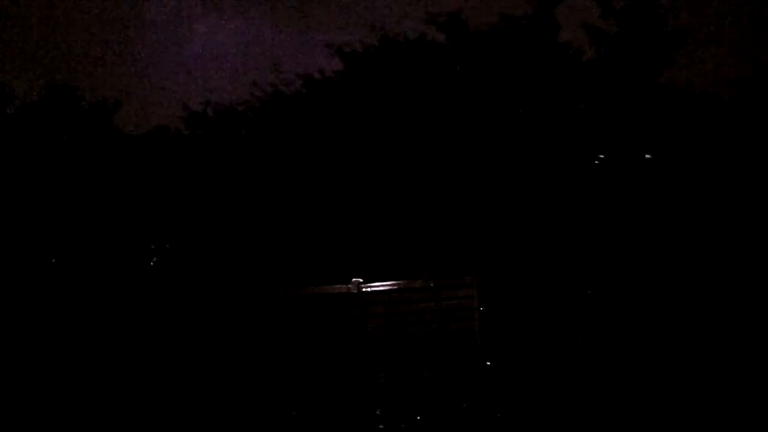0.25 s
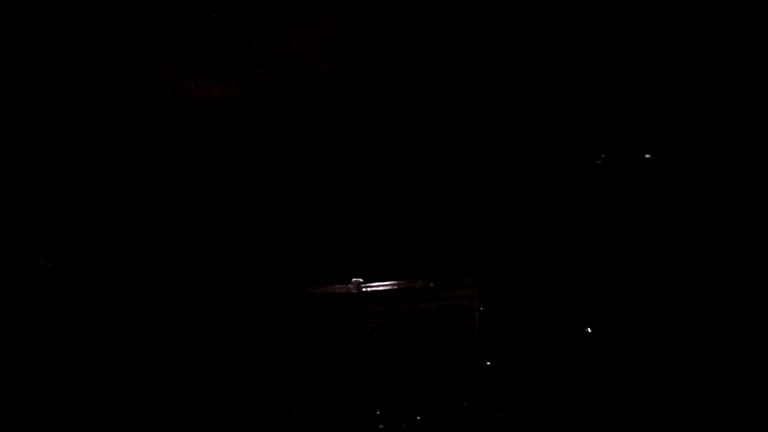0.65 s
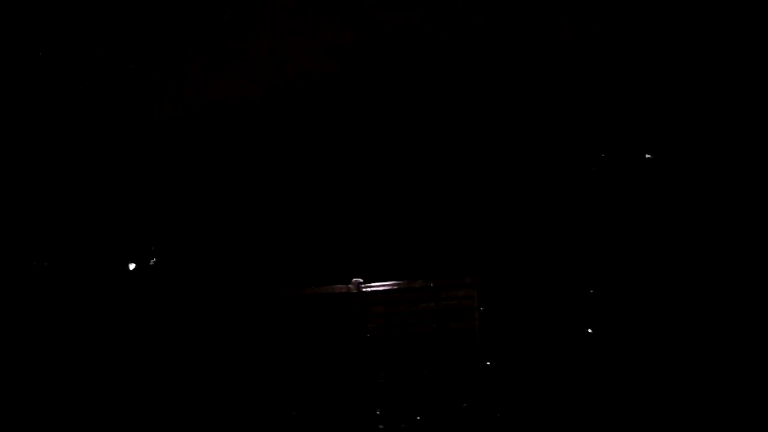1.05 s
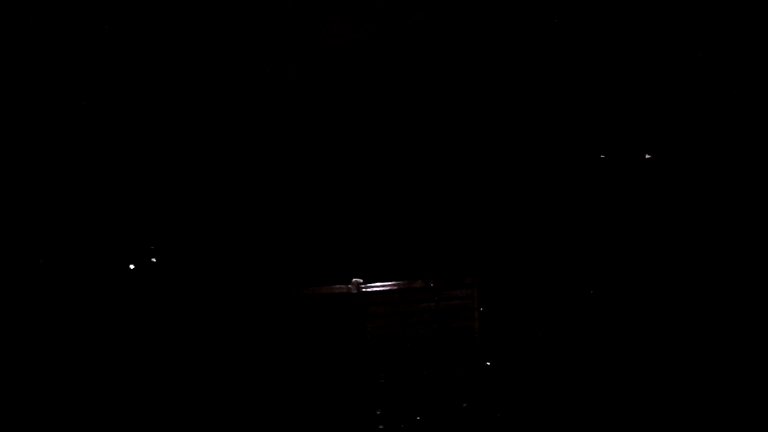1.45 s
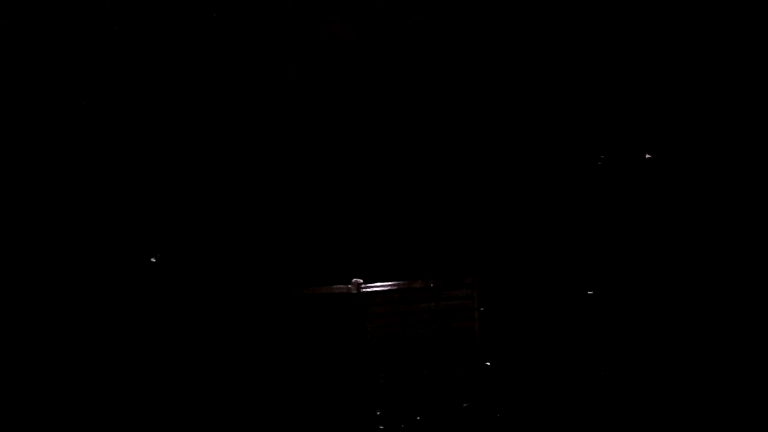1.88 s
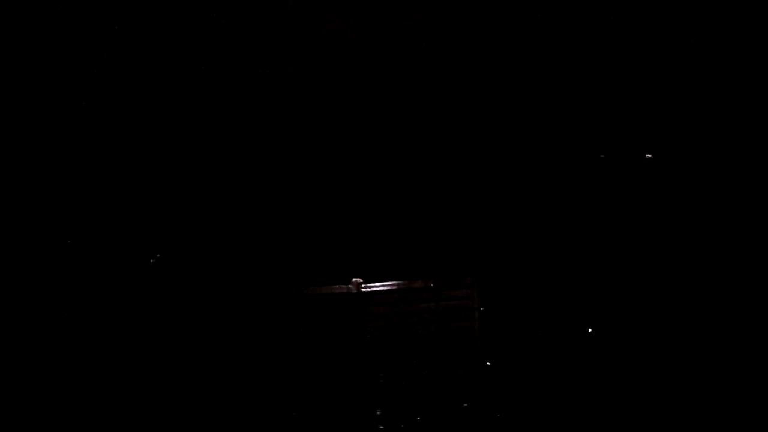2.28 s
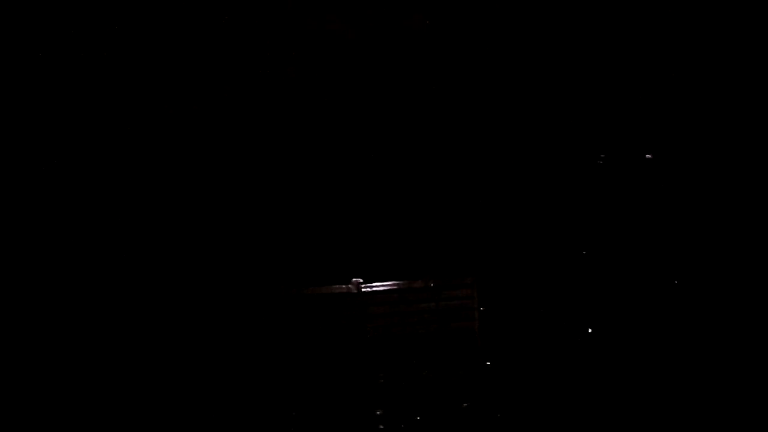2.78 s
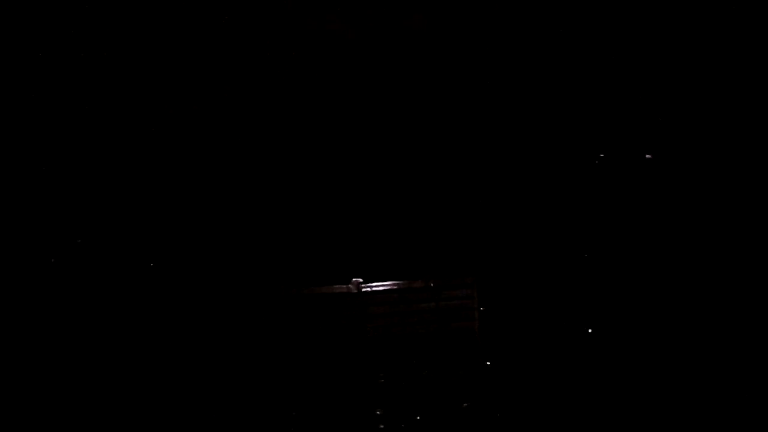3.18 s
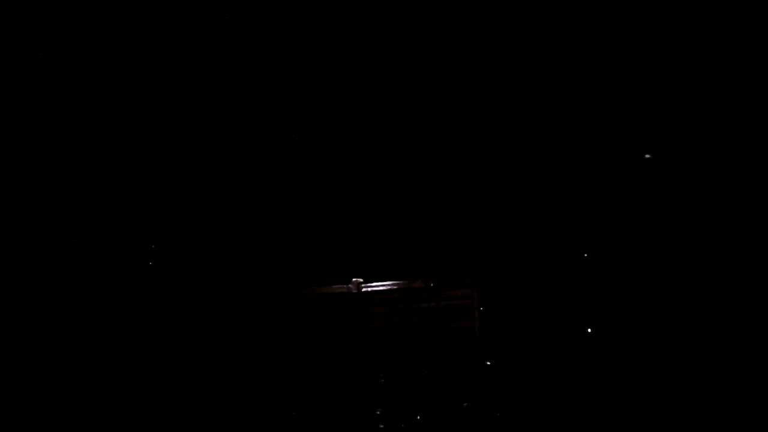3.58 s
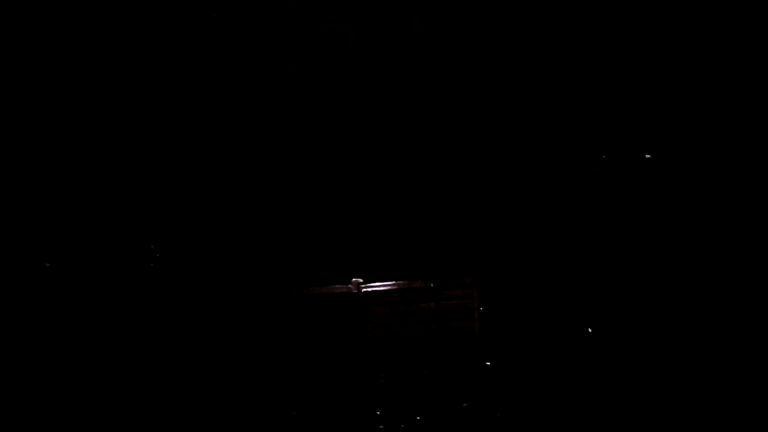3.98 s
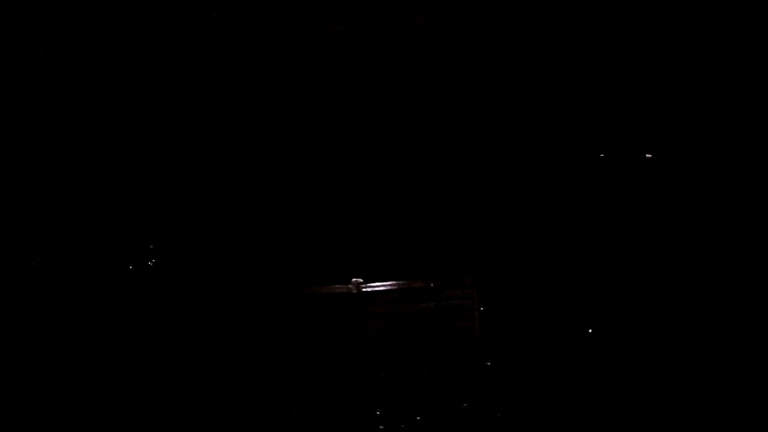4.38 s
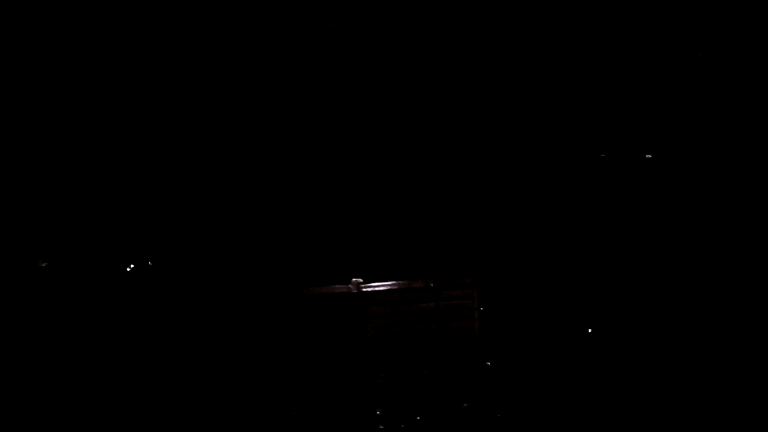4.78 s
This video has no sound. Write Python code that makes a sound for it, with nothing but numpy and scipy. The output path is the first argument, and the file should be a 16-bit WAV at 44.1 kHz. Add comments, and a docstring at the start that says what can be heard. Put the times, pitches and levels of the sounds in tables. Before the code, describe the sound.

Outdoors on a wet night, a small fixed camera's dull, narrow-band microphone hears steady rain. A bang is already fading at the start; two more follow within the first second, the second with a very sharp crack, their echoes crackling away. Wind then rumbles and thumps the microphone. Another hard crack comes near the middle, then a few close drips, and a last softer-edged bang near the end.

```python
"""Bangs over a wet night

Outdoors at night, one microphone in a small fixed camera: far rain is shaped noise, nearer drops are random clicks.
Wind at the port is swelling noise with single low thumps; close drips are gliding bubble notes with a splatter.
Five sharp bangs in the sky, most likely fireworks, scatter off ground, trees and houses into fading tails of clicks;
the first is already fading at the start. Two bangs also send a direct shock, and the housing rings slightly."""
import sys
import numpy as np
from scipy import signal
from scipy.fft import rfft, irfft, next_fast_len
from scipy.io import wavfile

SR = 44100
rng = np.random.default_rng(int(sys.argv[2]) if len(sys.argv) > 2 else 0)


def store_wav(level_fs):
    """Save 16-bit WAV to argv[1]."""
    pcm = np.round(np.clip(np.atleast_2d(level_fs), -1, 1) * 32767)
    wavfile.write(sys.argv[1], SR, pcm.T.astype(np.int16))


N = 222382
TIME = np.arange(N) / SR


def gain_of(db):
    """Decibels to amplitude."""
    return 10 ** (np.asarray(db) / 20)


def evened(x):
    """Scales to rms 1."""
    return x / np.sqrt(np.mean(x ** 2) + 1e-20)


def coloured(x, points, tilt_db=0):
    """Gives x a spectrum, tilted by some dB an octave, at rms 1."""
    size = next_fast_len(N)
    hz = np.fft.rfftfreq(size, 1 / SR) + 1  # the added 1 avoids log of zero
    f, db = np.transpose(points)
    spectrum_db = np.interp(np.log(hz), np.log(f), db) + tilt_db * np.log2(hz)
    return evened(irfft(rfft(x, size) * gain_of(spectrum_db), size)[:N])


def wander(rate_hz):
    """Slow random drift of rms 1, mostly below the given rate."""
    size = next_fast_len(N)
    hz = np.fft.rfftfreq(size, 1 / SR)
    slow = (hz > 0) / (1 + (hz / rate_hz) ** 4)
    return evened(irfft(rfft(rng.standard_normal(N), size) * slow, size)[:N])


def arrivals(per_s, spread_db):
    """Clicks at random moments, of either sign; a few are much larger than the rest."""
    size = gain_of(spread_db * np.minimum(rng.exponential(1, N), 4))
    sign = rng.choice([-1., 1.], N)
    return size * sign * (rng.random(N) < per_s / SR)


def packet(s, length, fade):
    """An envelope that opens within 0.36 ms, holds for a length, then dies away."""
    age = TIME - s
    return np.clip(age / 0.00036, 0, 1) * np.exp(-np.maximum(age - length, 0) / fade)


def low_pass(x, edge_hz):
    """A steep band limit."""
    return signal.oaconvolve(x, signal.firwin(255, edge_hz, window=("kaiser", 8), fs=SR), "same")


def strikes(rows):
    """One click for each row (t/s, level/dB)."""
    out = np.zeros(N)
    for s, db in rows:
        out[round(s * SR)] = gain_of(db)
    return out


def pressure_spike(t, width):
    """A sharp swing of pressure, down and straight back up, of peak 1."""
    u = t / width - 1
    return u * np.exp((1 - u ** 2) / 2)


# relative spectrum of the rain, far and near: f/Hz, level/dB per Hz
RAIN_SPECTRUM = [(15, -35), (25, 1.5), (51, -7), (87, -5), (157, -7.5), (185, -5), (213, -5), (510, -6.5),
                 (560, -7), (661, -6.5), (919, -6), (1620, -9.5), (2050, -16.5), (3600, -17), (6970, -34),
                 (9060, -58), (15300, -120)]
RAIN_DB, DROPS_DB, DROPS_PER_S = -35.5, -47, 700


def rain():
    """Countless far impacts merge into a smooth wash; nearer drops patter singly over it."""
    wash = coloured(rng.standard_normal(N), RAIN_SPECTRUM) * gain_of(0.41 * wander(rate_hz=5.3))
    drops = coloured(arrivals(DROPS_PER_S, spread_db=5.0), RAIN_SPECTRUM, tilt_db=-1.0)
    return gain_of(RAIN_DB) * wash + gain_of(DROPS_DB) * drops


# gusts at the microphone: peak t/s, rumble level/dB and flutter level/dB before trim and wander, rise/s, fall/s
GUSTS = [(1.235, -34, -29.5, 0.084, 0.04), (1.325, -38, -31, 0.076, 0.048), (1.47, -27, -25, 0.14, 0.06),
         (1.55, -25.5, -24, 0.046, 0.08), (1.67, -26.5, -24, 0.052, 0.095),
         (1.815, -30, -25.5, 0.06, 0.048), (1.885, -27, -29, 0.045, .07), (1.98, -30.5, -33, 0.048, 0.27),
         (2.762, -32, -27, 0.048, 0.027), (2.82, -38, -40, 0.038, 0.045), (3.195, -26, -36.5, 0.092, 0.052),
         (3.491, -35.5, -45, 0.077, 0.12), (4.14, -40, -40.5, 0.057, 0.14), (4.945, -40, -41, 0.041, 0.043)]
# relative spectra of the deep rumble, the lumpy flutter and the rasp of hard gusts: f/Hz, level/dB per Hz
RUMBLE_SPECTRUM = [(12, -21), (28, 5.5), (65, -3.5), (105, -6.5), (180, -13.5), (400, -60)]
FLUTTER_SPECTRUM = [(50, -44), (110, -0.5), (190, -0.5), (300, -2.5), (430, -12.5), (800, -14),
                    (2000, -51.5)]
RASP_SPECTRUM = [(170, -22), (300, 9), (560, 1), (800, -9), (1500, -27)]
GUST_DROP_DB, GUST_SHAPE = 9.5, 1.9  # a gust is this much weaker one rise before and one fall after its rounded peak
RASP_DB, RASP_GROWTH = -42.5, 2.6  # level at the strongest flutter; the power of flutter strength that it follows


def wind():
    """Eddies at the microphone port: rumble and flutter swell with each gust; the hardest gusts rasp."""
    rumble = coloured(rng.standard_normal(N), RUMBLE_SPECTRUM) * gain_of(-1.0 + 0.42 * wander(rate_hz=7.3))
    flutter = coloured(rng.standard_normal(N), FLUTTER_SPECTRUM) * gain_of(-2.4 + 0.36 * wander(rate_hz=20))
    rasp = coloured(arrivals(250, spread_db=3.5), RASP_SPECTRUM)
    push, stir = np.zeros((2, N))
    for s, rumble_db, flutter_db, rise, fall in GUSTS:
        away = np.maximum((s - TIME) / rise, (TIME - s) / fall)
        swell = gain_of(-GUST_DROP_DB * away ** GUST_SHAPE)
        push += swell * gain_of(rumble_db)
        stir += swell * gain_of(flutter_db)
    rasp_level = gain_of(RASP_DB) * (stir / stir.max()) ** RASP_GROWTH
    return push * rumble + stir * flutter + rasp_level * rasp


# single eddies that thump the microphone: centre t/s, level/dB, f/Hz, half length/s
BUFFETS = [(1.231, -27, 258, .012), (1.32, -20, 101, 0.0086), (1.518, -20, 130, 0.0071),
           (1.55, -21, 342, 0.002), (1.658, -25, 60, 0.012), (1.822, -22.5, 173, 0.017),
           (1.886, -24, 70, 0.0061), (1.952, -18, 45, 0.01), (2.77, -21.5, 209, 0.0088),
           (3.195, -25.5, 54.6, 0.011), (3.208, -19.5, 286, 0.0018), (4.162, -23.5, 126, 0.0076),
           (4.95, -33.5, 151, 0.016)]


def buffets():
    """An eddy pushes and pulls at the port in a short swing of pressure."""
    out = np.zeros(N)
    for s, db, hz, length in BUFFETS:
        swing = np.sin(2 * np.pi * hz * (TIME - s))
        out += gain_of(db) * swing * np.exp(-((TIME - s) / length) ** 2)
    return out


# drips close to the microphone: t/s, level/dB before the mix, f/Hz, t60/s after the hold, note gain/dB
DRIPS = [(3.436, -32.5, 1740, 0.065, 0), (4.003, -42, 3950, 0.018, -8), (4.2, -33.5, 1770, 0.07, 4.5),
         (4.412, -30, 1750, 0.05, -14)]
DRIP_GLIDE, DRIP_GLIDE_S = 0.14, 0.0043  # a bubble starts this share below its pitch; time constant of its rise


def drips():
    """Each drip traps a small bubble, whose note slides up to its pitch, and splatters around it."""
    out = np.zeros(N)
    for s, db, hz, t60, note_db in DRIPS:
        body = signal.iirpeak(hz, 2.4, fs=SR)
        splat = evened(signal.lfilter(*body, signal.lfilter(*body, rng.standard_normal(N))))
        pitch = hz * (1 - DRIP_GLIDE * np.exp(-np.maximum(TIME - s, 0) / DRIP_GLIDE_S))
        note = np.sin(2 * np.pi * np.cumsum(pitch) / SR)
        mix = 0.58 * splat + gain_of(note_db) * note
        out += gain_of(db) * mix * packet(s, 0.007, fade=t60 / np.log(1000))
    return out


# distinct echoes from large surfaces: t/s, level/dB before the near ring, hold/s
ECHOES = [(0.009, -26.5, 0.007), (0.044, -28, 0.012), (0.401, -32.5, 0.044), (0.568, -27.5, 0.014),
          (0.633, -35.5, 0.03), (0.831, -25, 0.013), (0.903, -26, 0.013), (0.973, -29.5, 0.018),
          (1.052, -28, 0.029), (1.101, -33.5, 0.016), (2.392, -23, 0.0095), (2.421, -29, 0.024),
          (2.541, -29, 0.0075), (2.632, -27.5, 0.013), (2.653, -31.5, 0.022), (2.816, -37, 0.012),
          (4.6, -38, 0.021), (4.64, -34, 0.013), (4.745, -37.5, 0.022), (4.82, -37, 0.017),
          (4.85, -42, .014)]
# relative spectrum of the wall echoes: f/Hz, level/dB per Hz
SLAP_SPECTRUM = [(100, -27), (400, -10), (1000, -3.5), (1700, 2), (2250, -1.5), (2870, -6), (3300, -9),
                 (4420, -16), (5300, -20), (6970, -31), (9060, -57)]


def echoes():
    """Hard walls return brighter slaps that stand out of the tails."""
    slap = coloured(arrivals(2000, spread_db=1.5), SLAP_SPECTRUM)
    return slap * sum(gain_of(db) * packet(s, length, fade=0.0073) for s, db, length in ECHOES)


# single sharp reflections within the tails: t/s, peak level/dB
SNAPS = [(0.016, -22), (0.517, -9), (0.841, -13), (2.423, -17.5), (2.471, -20), (2.535, -11.5),
         (2.577, -16), (2.670, -15), (4.532, -23), (4.569, -17)]
SNAP_WIDTH_S = 0.00022


def snaps():
    """Small flat surfaces return the spike a little softened, as single snaps within the tails."""
    t = np.arange(-100, 101) / SR
    return signal.oaconvolve(strikes(SNAPS), pressure_spike(t, SNAP_WIDTH_S), "same")


# surfaces near the camera: f/Hz, width/Hz, lift/dB of each resonance alone
NEAR_RING = [(385, 40, 3), (631, 50, 3.5), (1215, 40, 4.5), (1513, 30, 4), (1662, 45, 5), (1777, 22, 4.5),
             (1936, 25, 3), (2094, 34, 6), (2386, 22, 4.5), (3147, 60, 3.5), (5224, 28, 5)]


def ringing(x):
    """Surfaces close to the camera ring briefly at a few pitches after every arrival."""
    out = x.copy()
    for hz, width, db in NEAR_RING:
        resonance = signal.lfilter(*signal.iirpeak(hz, hz / width, fs=SR), x)
        out += (gain_of(db) - 1) * resonance
    return out


# bangs: t/s, burst level/dB and burst hold/s, then tail level/dB before clumping, tail hold/s,
# tail fall/dB per s, tail brightness/dB per octave; levels are before the near ring
BANGS = [(-0.05, -26, 0.021, -24, 0.12, 43.5, 0), (0.405, -19.5, 0.015, -24.5, 0.079, 41, -0.4),
         (0.768, -24.5, 0.014, -24, 0.21, 48, -0.5), (2.367, -21.5, 0.0087, -23.5, 0.25, 48.5, 0.2),
         (4.478, -18.5, 0.019, -24.5, 0.15, 47.5, -0.13)]
# relative spectrum of the scattered sound: f/Hz, level/dB per Hz
SCATTER_SPECTRUM = [(18, -40), (30, -2), (65, -6), (178, -1.5), (274, -7), (385, -3.5), (432, -5.5),
                    (636, -2), (1350, -5.5), (1700, -6.5), (2250, -12), (2870, -18.5), (3210, -20.5),
                    (4420, -31.5), (5300, -31), (6970, -47), (9060, -74), (15300, -120)]


def bangs():
    """Each bang comes as a tight burst of near reflections, then as thousands of scattered ones."""
    clumps = gain_of(-0.95 + 0.5 * wander(rate_hz=67))
    out = np.zeros(N)
    for s, burst_db, length, tail_db, hold, fall, bright in BANGS:
        near = coloured(arrivals(5000, spread_db=1.5), SCATTER_SPECTRUM, tilt_db=0.5)
        near = evened(np.tanh(0.6 * near))  # the loudest part overloads the microphone
        early = coloured(arrivals(3000, spread_db=2.0), SCATTER_SPECTRUM, tilt_db=0.6 + bright)
        # long paths lose treble
        late = coloured(arrivals(3500, spread_db=3.5), SCATTER_SPECTRUM, tilt_db=-0.1 + bright)
        age = np.maximum(TIME - s, 0)
        far = 1 - np.exp(-(age / (hold + 0.11)) ** 2)  # share of power in the late paths
        level = gain_of(tail_db - fall * np.maximum(age - hold, 0)) * (1 - np.exp(-age / 0.011))
        out += gain_of(burst_db) * packet(s, length, fade=0.0096) * near
        out += level * clumps * (np.sqrt(1 - far) * early + np.sqrt(far) * late)
    return out


# shock fronts that reach the camera in a straight line: t/s, level/dB of the main spike alone
SHOCKS = [(0.7667, -3), (2.3657, -2)]
# what a shock sets ringing in the housing: f/Hz, level/dB beside the spike before the rise, t60/s, rise/s
SHOCK_MODES = [(263, -15, 0.016, 0.00055), (1700, 1.5, 0.016, 0.0021), (2400, -2, .006, 0.00046)]
SHOCK_WIDTH_S, SHOCK_LEAD_S = 0.00014, 0.00114
SHOCK_FRONT_DB, CRACK_DB, CRACK_T60_S = -7.5, -21, 0.0024  # levels beside the spike


def shocks():
    """A weak, dull front and a broad crack lead the main spike, which sets the housing ringing for a few cycles."""
    t = np.arange(-1000, 1001) / SR
    age, lead_age = np.maximum(t, 0), np.maximum(t + SHOCK_LEAD_S, 0)
    front = -gain_of(SHOCK_FRONT_DB) * np.exp(-((t + SHOCK_LEAD_S) / 0.00025) ** 2)
    crack_band = signal.butter(2, [3300, 5000], "band", fs=SR)
    grit = evened(signal.lfilter(*crack_band, rng.standard_normal(len(t))))
    crack = grit * (lead_age > 0) * gain_of(CRACK_DB - 60 * age / CRACK_T60_S)
    ring = np.zeros(len(t))
    for hz, db, t60, rise in SHOCK_MODES:
        swell = gain_of(db - 60 * age / t60) * (1 - np.exp(-age / rise))
        ring += np.sin(2 * np.pi * hz * age) * swell
    shock = front + crack + pressure_spike(t, SHOCK_WIDTH_S) - ring
    return signal.oaconvolve(strikes(SHOCKS), shock, "same")


def scene():
    """Everything that meets at the one microphone."""
    background = rain() + wind() + buffets() + drips()
    scattered = ringing(bangs() + echoes()) + snaps()
    return (background + scattered + shocks())[None]


# resonances of the camera housing: f/Hz, width/Hz, lift/dB before an overall trim
HOUSING = [(590, 150, 0.5), (1720, 86, 1), (2020, 660, 1.5), (3350, 320, 3), (5330, 1700, 2.5)]
# relative spectrum of the microphone hiss and the peak tick: f/Hz, level/dB per Hz
HISS_SPECTRUM = [(7800, -17.5), (8700, 1.5), (11000, 4), (13500, -4), (15000, -9.5)]
MIC_HISS_DB, PEAK_TICK_DB = -69, -77
VOICE_BAND_HZ, EDGE_HZ = 7350, 14800


def record(dry):
    """Housing resonances, overload on loud peaks, a narrow voice band, faint hiss, and the final band limit."""
    hz = np.fft.rfftfreq(N, 1 / SR)
    lift_db = sum(db / (1 + (2 * (hz - centre) / width) ** 2) for centre, width, db in HOUSING)
    heard = irfft(rfft(dry[0]) * gain_of(lift_db - 1.61), N)
    squeezed = heard / (1 + (heard / 0.72) ** 6) ** (1 / 6)  # peaks level off at 0.72
    hiss = gain_of(MIC_HISS_DB) * coloured(rng.standard_normal(N), HISS_SPECTRUM)
    peak_noise = (heard - squeezed) * rng.standard_normal(N)
    tick = gain_of(PEAK_TICK_DB) * coloured(peak_noise, HISS_SPECTRUM)  # a faint thin treble tick on the loudest peaks
    return low_pass(low_pass(squeezed, VOICE_BAND_HZ) + hiss + tick, EDGE_HZ)[None]


dry = scene()
out = record(dry)
store_wav(out)
```